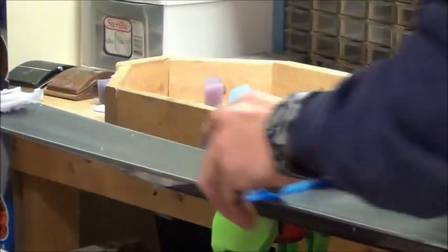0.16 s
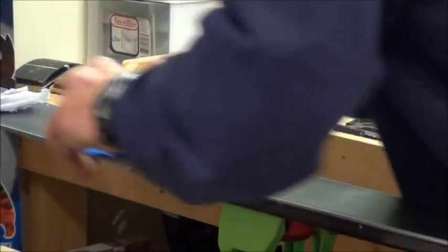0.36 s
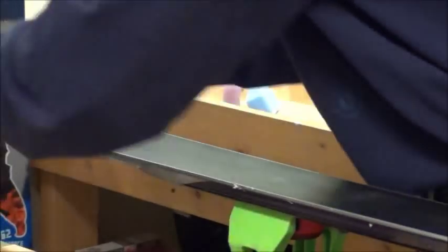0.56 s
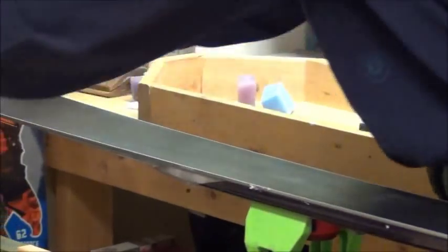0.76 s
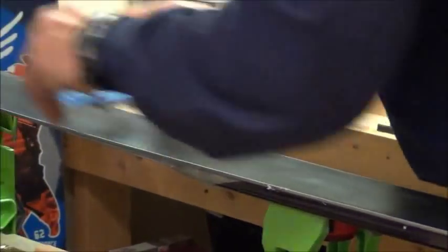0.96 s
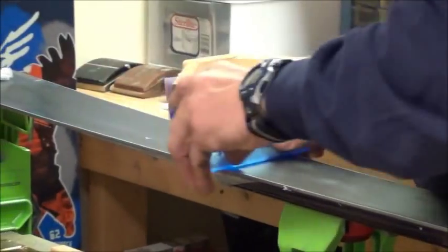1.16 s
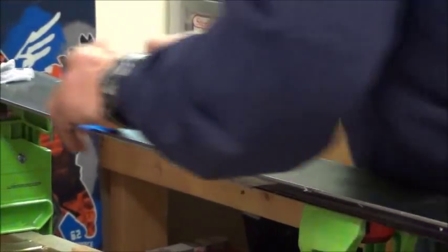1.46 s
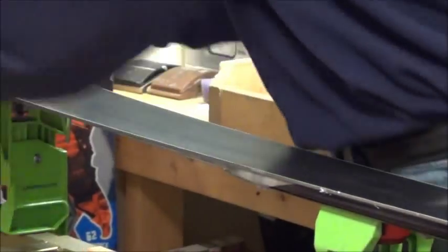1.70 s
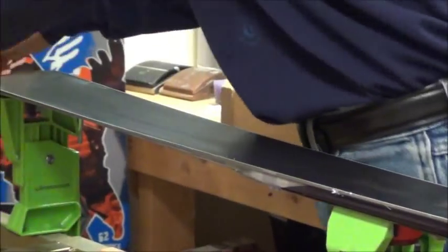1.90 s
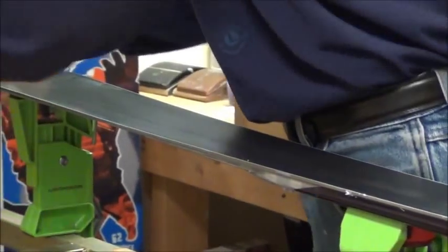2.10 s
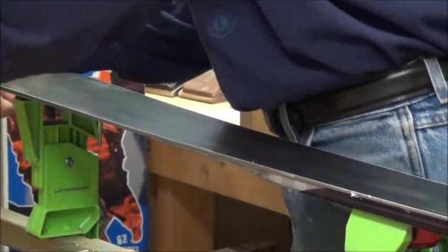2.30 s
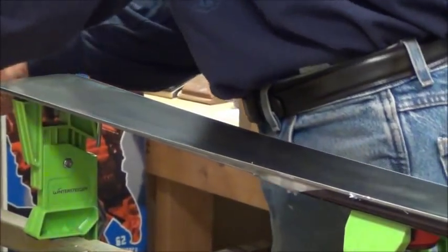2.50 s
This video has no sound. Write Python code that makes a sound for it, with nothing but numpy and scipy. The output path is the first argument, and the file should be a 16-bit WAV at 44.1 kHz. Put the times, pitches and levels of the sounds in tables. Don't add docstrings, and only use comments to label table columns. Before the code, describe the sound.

Close in a small room, a bright scrape swells and fades along a ski base, faint bumps follow, a second scrape builds and ends in a woody clack, then soft knocks settle over low room hiss.

```python
import sys
import numpy as np
from scipy import signal
from scipy.fft import rfft, irfft
from scipy.io import wavfile
from scipy.ndimage import uniform_filter1d

SR = 44100
rng = np.random.default_rng(int(sys.argv[2]) if len(sys.argv) > 2 else 0)


def field_ratio(decibels):
    return 10 ** (np.asarray(decibels, dtype=float) / 20)


def dump(signal):
    limited = np.clip(np.atleast_2d(signal).T, -1, 1)
    pcm = np.round(limited * 32767).astype(np.int16)
    wavfile.write(sys.argv[1], SR, pcm)


N = 116865

# pitch in Hz, level in dB, time to fall 60 dB in seconds.
BENCH_MODES = [(72, 0.5, 0.26), (89.5, -4, 0.16), (135.4, -8, 0.16), (169, 4.5, 0.34), (233.5, 9, 0.14),
               (293, 1.5, 0.098), (364.6, -1.5, 0.096), (423, -0.5, 0.072), (540, 1, 0.19),
               (622, -3.5, 0.15), (760, -30, 0.17), (880, -32, 0.072), (1160, -22, 0.046)]


def evened(x):
    return x / np.sqrt(np.mean(x ** 2) + 1e-20)


def read(points, hz):
    f, value = np.transpose(points)
    return np.interp(np.log(hz + 1), np.log(f + 1), value)


def add(mix, start, sound):
    part = mix[round(start * SR):][:len(sound)]
    part += sound[:len(part)]


def resonate(x, hz, width):
    return signal.lfilter(*signal.iirpeak(hz, hz / max(width, 1), SR), x)


def band(x, hz, octaves):
    edges = hz * 2 ** (np.array([-0.5, 0.5]) * max(octaves, 0.05))
    edges = np.clip(edges, [20, 30], [SR / 2.2, SR / 2.1])
    return signal.sosfilt(signal.butter(2, edges, "band", fs=SR, output="sos"), x)


def ring(x, modes, shift=1):
    rung = 0
    for hz, db, t60 in modes:
        rung = rung + field_ratio(db) * resonate(x, hz * shift, 1.67 / t60) / np.sqrt(t60)
    return evened(rung)


def floor():
    # frequency in Hz, level in dB per Hz.
    floor_colour = [(30, 0.5), (90, -0.5), (190, -15), (400, -9), (950, -10.5), (2000, -19), (5000, -25.5),
                    (16000, -27.5)]
    same = 0.83
    a, b = rfft(rng.standard_normal((2, N)))
    ears = np.array([a, same * a + np.sqrt(1 - same ** 2) * b])
    ears = ears * field_ratio(read(floor_colour, np.fft.rfftfreq(N, 1 / SR)))
    return field_ratio(-40.5) * evened(irfft(ears, N))


def swell(length, db, hz, octaves):
    size = round(length * SR)
    rubbing = evened(band(rng.standard_normal(size), hz, octaves))
    return field_ratio(db) * np.hanning(size) * rubbing


def brushes():
    # start in seconds, length in seconds, level in dB, centre in Hz, width in octaves.
    touches = [
        (0.045, 0.072, -44, 8880, 0.31),
        (0.723, 0.15, -29, 1060, 1.7),
        (0.707, 0.11, -25.5, 3700, 0.3),
        (0.871, 0.1, -35.5, 8800, 5.3),
        (1.093, 0.15, -39, 10700, 3.1),
        (1.194, 0.096, -29.5, 5400, 2),
        (1.23, 0.082, -38, 1940, 0.74),
    ]
    out = np.zeros(N)
    for start, *rest in touches:
        add(out, start, swell(*rest))
    return out


def knocks(table, modes, direct_db, shift):
    out = np.zeros(N)
    t = np.arange(0, 0.35, 1 / SR)
    fade = np.hanning(2 * len(t))[len(t):]
    for start, db, hz, octaves, rattle in table:
        grains_db = 3.04 * np.minimum(rng.exponential(1, len(t)), 3)
        grit = rng.standard_normal(len(t)) * field_ratio(grains_db)
        rise = np.minimum(t * hz / 0.7, 1)
        push = band(grit * np.exp(-(t / rattle) ** 1.3) * rise, hz, octaves)
        grip = 1 + shift * rng.uniform(-1.04, 1)
        rung = field_ratio(direct_db) * evened(push) + ring(push, modes, grip)
        add(out, start, field_ratio(db) * evened(rung) * np.sqrt(0.014 / rattle) * fade)
    return out


def bench_knocks():
    # start in seconds, level in dB, centre in Hz, width in octaves, rattle in seconds.
    booms = [
        (.13, -39, 80, 0.84, 0.089),
        (.53, -46, 60, 1, 0.032),
        (.652, -32.5, 76.4, 2.6, 0.024),
        (1.2, -38.5, 78.4, 0.81, 0.094),
        (1.558, -38.5, 68.4, 2.4, 0.024),
        (1.725, -29, 78.6, 2.44, 0.071),
        (1.806, -21, 108, 1.38, 0.063),
        (2.2, -32.5, 80, 3.4, 0.038),
        (2.365, -32, 72, 2.1, 0.012),
    ]
    thuds = [(.121, -34, 490, 2, 0.05), (.495, -43.5, 540, 0.1, 0.03), (0.648, -29.5, 298, 0.71, 0.012),
             (0.681, -35.5, 203, 2.3, 0.039), (.897, -30.5, 258, 1.45, 0.08),
             (.965, -29.5, 242, 2.44, 0.055), (1.195, -33, 540, 2.1, 0.039), (1.556, -34, 444, 1.7, 0.039),
             (1.722, -24.5, 1300, 1.38, 0.028), (1.805, -20.5, 1000, 1.56, 0.057),
             (2.196, -34, 274, 1.4, 0.042), (2.269, -38, 345, 2.1, 0.095), (2.363, -29.5, 480, 2.8, 0.021),
             (2.408, -41, 242, 1.04, 0.018), (2.472, -42.5, 365, 0.62, 0.012),
             (2.612, -40.5, 415, 2.2, 0.038)]
    return knocks(booms + thuds, BENCH_MODES, direct_db=4.5, shift=0.042)


def blade_clacks():
    # start in seconds, level in dB, centre in Hz, width in octaves, rattle in seconds.
    clacks = [(.12, -46, 2470, 2.8, 0.03), (.915, -34, 1760, 1.46, 0.12), (.969, -33, 1500, 2.45, 0.036),
              (.969, -45, 8900, 2.8, 0.017), (1.195, -34, 6670, 4.2, 0.0532),
              (1.797, -20, 2640, 0.58, 0.033), (1.8, -29, 5300, 0.2, 0.039),
              (1.798, -24.5, 6250, 2.1, 0.049), (1.81, -17.5, 2310, 1.37, 0.055),
              (1.85, -33.5, 2370, 2, 0.021), (2.12, -54.5, 10200, 0.65, 0.042),
              (2.17, -47.5, 9500, 2.4, 0.015), (2.273, -62, 8940, 2.6, 0.0089),
              (2.2955, -52.5, 3950, 0.45, 0.0074), (2.2955, -56, 7760, 0.275, 0.0092),
              (2.2965, -47.5, 10900, 0.8, 0.026), (2.3, -46.5, 1500, 1.9, 0.027),
              (2.359, -41, 7750, 6, 0.019), (2.3615, -34.5, 3460, 3.2, 0.022),
              (2.606, -56, 2500, 2.3, 0.0273)]
    # pitch in Hz, level in dB, time to fall 60 dB in seconds.
    plate_modes = [(1420, 0, .012), (1850, 0, .012), (2200, 1, .014), (2650, 4, .016), (3390, 1, .012),
                   (3730, -1, .01), (4070, -1, .008), (5400, 1, .008), (7600, 2, .005), (11500, 0, .002)]
    return knocks(clacks, plate_modes, direct_db=8, shift=0.024)


def rings():
    # start in seconds, peak level in dB, pitch in Hz, time to fall 60 dB in seconds.
    tones = [(.123, -23, 411, 0.1), (.648, -12.5, 310, 0.19), (.648, -17, 384, 0.11),
             (0.701, -25, 330, 0.17), (0.829, -34.5, 300, 0.41), (.68, -25, 180, 0.2),
             (.968, -27, 241, .15), (1.015, -25, 200, 0.21), (1.196, -27, 455, .14), (1.2, -25, 896, 0.12),
             (1.205, -23.5, 540, 0.24), (1.215, -25, 228.4, 0.24), (1.557, -25, 177, 0.168),
             (1.557, -23.5, 640, 0.076), (1.557, -32, 450, 0.079), (1.558, -28, 800, 0.078),
             (1.796, -15, 2650, .1), (1.798, -20, 2230, .08), (1.8, -30, 5400, 0.25),
             (1.82, -24, 2700, .14), (1.804, -11.5, 105, 0.21), (1.83, -23.5, 232, 0.4),
             (1.84, -20.5, 620, .15), (1.856, -8, 91, 0.15), (1.855, -22, 280, 0.19),
             (1.86, -26, 160, 0.37), (1.909, -28, 370, 0.34), (1.914, -23, 102, 0.24),
             (1.951, -21.5, 90, 0.37), (2.198, -30, 368, .12), (2.202, -20.5, 262, 0.19),
             (2.222, -19.5, 172, 0.15), (2.222, -25, 390, .17), (2.231, -26, 265, 0.097),
             (2.258, -28, 140, .15), (2.303, -33, 785, .14), (2.363, -17, 447, 0.16),
             (2.364, -16, 577, 0.15), (2.365, -35, 352, .11), (2.365, -20, 80, 0.15),
             (2.367, -22, 1256, 0.09), (2.4, -22.5, 199, 0.28), (2.474, -26.5, 383, 0.093),
             (2.485, -25, 168.5, 0.16)]
    out = np.zeros(N)
    t = np.arange(0, 0.4, 1 / SR)
    for start, db, hz, t60 in tones:
        rise = 1 - np.exp(-t * hz / 0.63)
        add(out, start, field_ratio(db - 60 * t / t60) * rise * np.sin(2 * np.pi * hz * t))
    return out


def scrape():
    # time in seconds, pressure in dB, moving edge resonance in Hz,
    # dullness from 0 to 1 as the blade slows, blade hum in dB.
    strokes = [
        [(0.17, -50, 4820, 0.39, 11), (0.206, -28.5, 5100, 0.67, 2), (0.26, -19, 5730, 0.35, 10),
         (0.316, -15, 4660, 0.32, 3), (0.43, -13, 5860, 0.29, 1), (0.518, -9.5, 5100, 0.26, 2),
         (0.598, -11, 6170, 0.28, -7.5), (0.756, -19.5, 6000, 0.76, -3.5), (0.88, -49.5, 5500, 0.7, 4)],
        [(1.31, -39.5, 5200, 0.86, 2), (1.38, -23, 5340, 0.46, 1.5), (1.524, -11.5, 5510, 0.3, -2),
         (1.772, -10, 6100, 0.34, -1.5), (1.788, -20, 5800, 0.4, 8)],
    ]
    # frequency in Hz, level in dB per Hz.
    fast = [(500, -21.5), (1230, -20), (2600, -13.5), (6800, -9), (9600, -0.5), (12100, -1), (13200, -8),
            (15700, -8)]
    slow = [(410, -31), (700, -6), (922, -9), (2300, 5.5), (2730, -10), (3690, -2.5), (4490, -8.5),
            (11500, -21.5), (16000, -24.5)]
    # pitch in Hz, width in Hz, level in dB.
    blade_peaks = [(3700, 310, -3.5), (8700, 330, 1), (9500, 700, 0.5), (10240, 850, -2),
                   (11400, 370, -2.5)]
    slips_per_s, slip_spread_db, flutter_db, patchy_db = 26000, 1.8, 0.9, 1.5
    edge_db, edge_width_hz, hum_hz, hum_width_hz = 5.5, 1160, 2176, 200

    slips = (rng.random(N) < slips_per_s / SR) * rng.standard_normal(N)
    slips = slips * field_ratio(slip_spread_db * np.minimum(rng.exponential(1, N), 3))
    flutter = evened(uniform_filter1d(rng.standard_normal(N), size=150))
    slips = slips * field_ratio(flutter_db * flutter)
    blade = slips.copy()
    for f, width, db in blade_peaks:
        blade += (field_ratio(db) - 1) * resonate(slips, f, width)

    hz, frames, z = signal.stft(blade, SR, nperseg=512)
    hz = hz[:, None]
    rows = np.concatenate(strokes)
    edge_hz, dull, hum_db = (np.interp(frames, rows[:, 0], rows[:, k]) for k in (2, 3, 4))
    dull = np.clip(dull, 0, 1.5)
    patches = uniform_filter1d(rng.standard_normal(z.shape), size=6, axis=0)
    patches = evened(uniform_filter1d(patches, size=6, axis=1))
    edge = edge_db / (1 + ((hz - edge_hz) / edge_width_hz) ** 2)
    hum = hum_db / (1 + ((hz - hum_hz) / hum_width_hz) ** 2)
    speed_colour = read(fast, hz) * (1.5 - dull) + read(slow, hz) * dull
    colour = field_ratio(speed_colour + edge + hum + patchy_db * patches) * (hz > 400)
    colour = colour / np.sqrt((colour ** 2).mean(0))
    hiss = evened(signal.istft(z * colour, SR, nperseg=512)[1][:N])

    rumble = field_ratio(-35) * evened(band(ring(slips, BENCH_MODES), 400, 1.3))
    t = np.arange(N) / SR
    pressure = np.zeros(N)
    for stroke in strokes:
        times, db = np.transpose(stroke)[:2]
        pressure += field_ratio(np.interp(t, times, db, left=-99, right=-99))
    return (hiss + rumble) * pressure


def slide(length, db, from_hz, to_hz, width):
    size = round(length * SR)
    fuzz = evened(uniform_filter1d(rng.standard_normal(size), round(SR / width / 2)))
    phase = 2 * np.pi * np.cumsum(np.linspace(from_hz, to_hz, size)) / SR
    return field_ratio(db) * np.hanning(size) * (1 + fuzz) * np.sin(phase)


def squeaks():
    sagging = (0.44, 0.0848, -32, 1596, 900, 92)
    steady = (.692, .045, -25.5, 1645)
    out = np.zeros(N)
    add(out, sagging[0], slide(*sagging[1:]))
    add(out, steady[0], swell(*steady[1:], octaves=0.07))
    return out


def bench_top(x):
    taps = np.zeros((2, 600))
    at = rng.integers(30, 600, (2, 10))
    np.put_along_axis(taps, at, rng.choice([-1., 1.], (2, 10)), 1)
    echoes = signal.oaconvolve(band(x, 6700, 3.9)[None], taps / np.sqrt(10), axes=1)
    return field_ratio(-6.5) * echoes[:, :N]


def room(x):
    # frequency in Hz, time to fall 60 dB in seconds.
    decay = [(80, 0.6), (300, 0.51), (1500, 0.37), (3500, 0.37), (7000, 0.32), (13000, 0.26)]
    taps = np.zeros((2, SR // 2))
    at = np.arange(120, SR // 2 - 20, 20) + rng.integers(0, 20, (2, (SR // 2 - 121) // 20))
    np.put_along_axis(taps, at, rng.choice([-1., 1.], at.shape), 1)
    hz, t, z = signal.stft(taps, SR, nperseg=512, noverlap=448)
    apart = (0.45 * hz / (hz + 140))[:, None]
    z = np.array([z[0] + apart * z[1], z[0] - apart * z[1]])
    z = z * field_ratio(-60 * t / read(decay, hz)[:, None])
    tail = signal.istft(z, SR, nperseg=512, noverlap=448)[1]
    return signal.fftconvolve(x[None], tail / np.linalg.norm(tail[0]), axes=1)[:, :N]


def scene():
    hits = bench_knocks() + blade_clacks()
    sung = rings()
    rub = scrape() + brushes() + squeaks()
    send = field_ratio(-5) * hits + field_ratio(-9) * sung + field_ratio(-6.5) * rub
    turn = 2 * np.pi * 1.696 * np.arange(N) / SR
    wet = room(send * np.sin(turn)) + room(send * np.cos(turn))
    near = hits + sung + rub + wet + bench_top(hits + rub)
    gain_db, left_db = -1.5, 0.45
    return near * field_ratio(gain_db + np.array([[left_db], [-left_db]])) + floor()


def roll_off(x):
    return signal.sosfilt(signal.butter(12, 15760, fs=SR, output="sos"), x)


def record(dry):
    cut = signal.sosfilt(signal.butter(3, 50, "high", fs=SR, output="sos"), dry)
    headroom = 1.05
    soft = headroom * np.tanh(cut / headroom)
    treble_limit = signal.firwin(401, 15900, window=("kaiser", 9), fs=SR)
    mix = signal.oaconvolve(soft, treble_limit[None], "same")
    return roll_off(mix)


dry = scene()
out = record(dry)
dump(out)
```